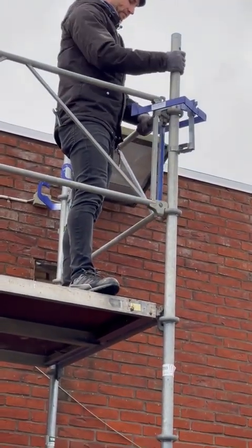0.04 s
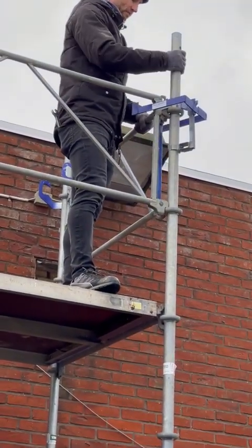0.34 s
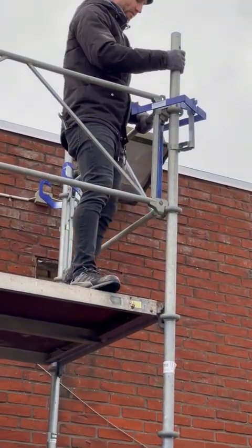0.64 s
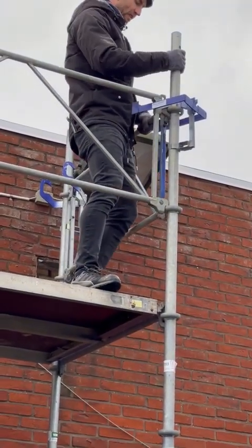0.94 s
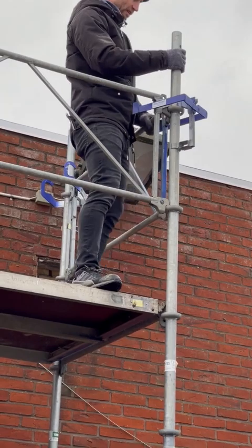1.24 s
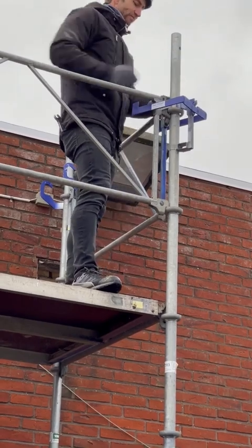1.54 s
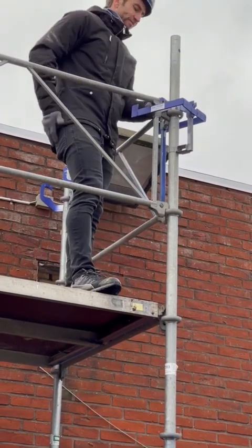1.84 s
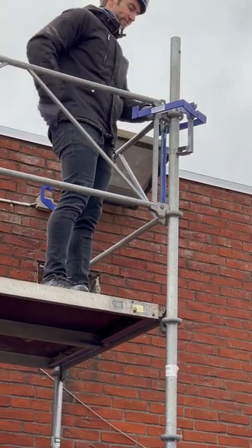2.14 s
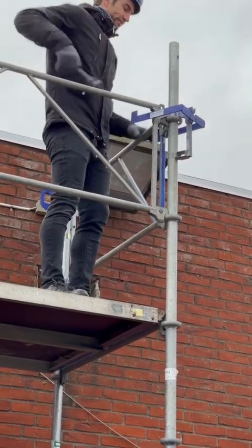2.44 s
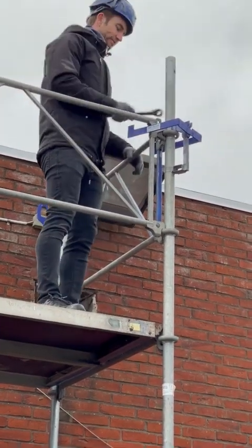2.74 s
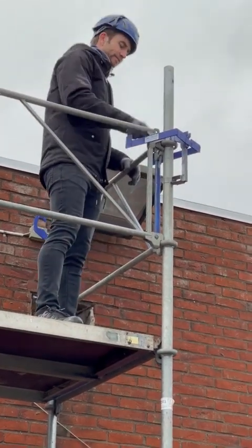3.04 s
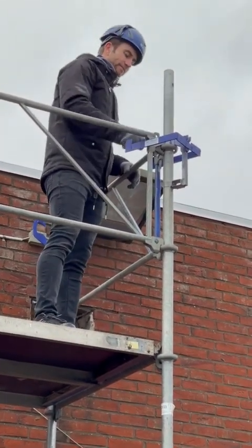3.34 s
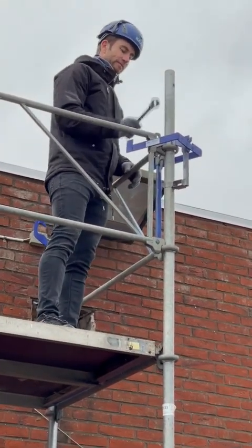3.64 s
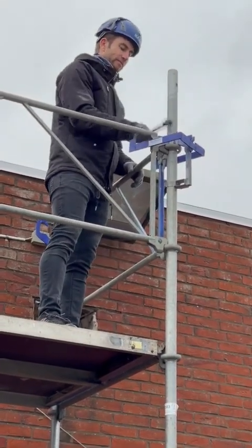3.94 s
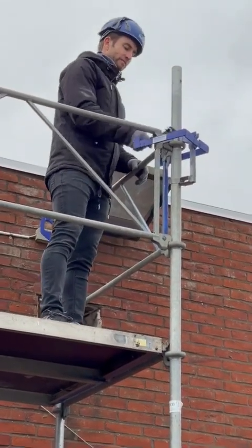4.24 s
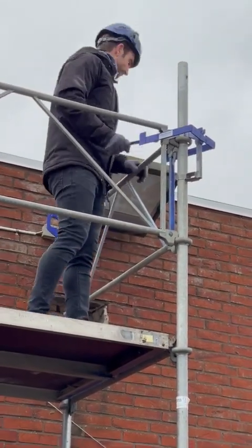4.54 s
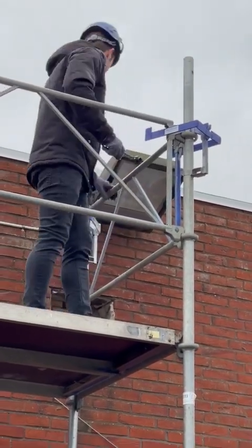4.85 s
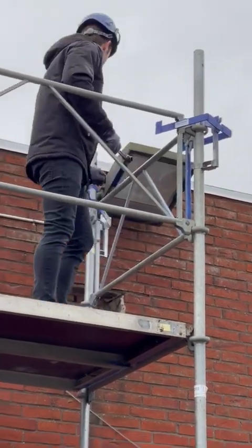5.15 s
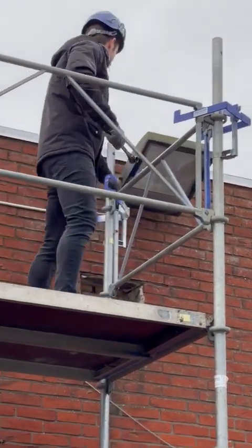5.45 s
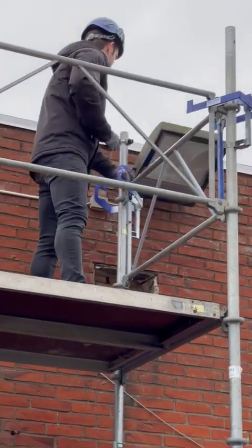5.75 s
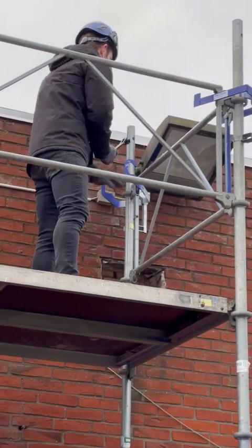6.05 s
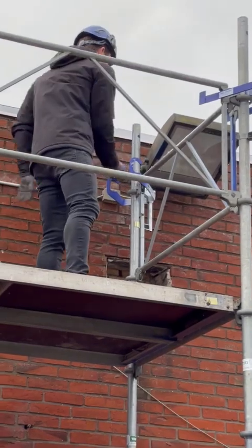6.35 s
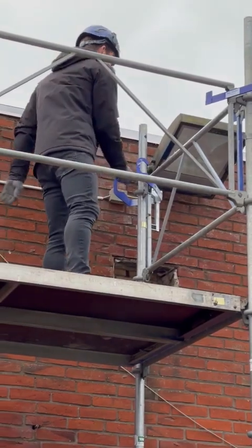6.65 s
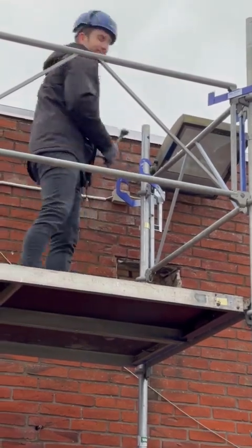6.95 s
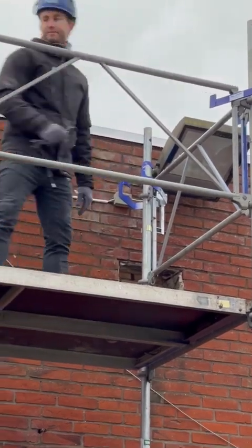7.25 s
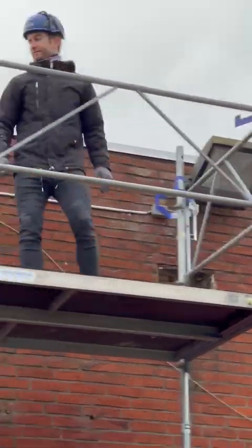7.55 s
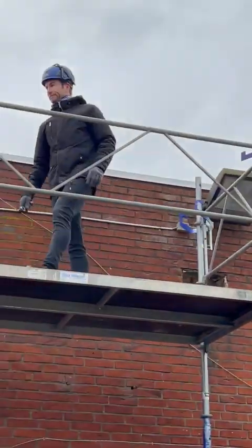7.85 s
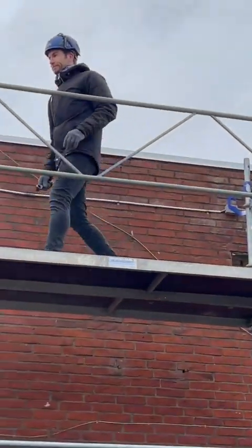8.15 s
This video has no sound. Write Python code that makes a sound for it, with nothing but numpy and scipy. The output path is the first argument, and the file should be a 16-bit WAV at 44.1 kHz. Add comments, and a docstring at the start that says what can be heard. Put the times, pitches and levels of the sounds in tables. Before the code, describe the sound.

Scaffold work is heard close in an outdoor yard, over a low wind rumble and a dull wash of distant traffic. For the first two seconds a guardrail bumps lightly in its seat while loose steel parts clink and tinkle, with a few scuffs of cloth and soles. A boot thuds on the deck at about 2.7 seconds. The loudest sounds are sharp hammer blows on steel clamps: two at 3.0 and 3.3 seconds, and two more at 3.9 and 4.2. Each clangs and leaves the tubes and the yard ringing briefly. After another step, a metal post scrapes down its holder in two pushes between 5.5 and 6 seconds. A last pair of blows lands at 6.3 and 6.6 seconds. From 7 seconds, fittings snap quietly and boots scuff, with soft thuds on the deck around 8 seconds.

```python
"""A scaffold in a yard, in front of a brick wall, heard on a close pair of microphones.
First a worker jiggles a guardrail: it bumps in its seat and loose steel parts clink. A boot thuds on the
deck, then two clamps are hammered home, two blows each. A post scrapes down its holder and a third clamp
takes two blows. Last, fittings snap and boots scuff and thud. The tubes and the yard ring after each
blow; low wind and distant traffic lie under it all."""
import sys
import numpy as np
from scipy import signal
from scipy.fft import rfft, irfft
from scipy.io import wavfile
from scipy.ndimage import uniform_filter1d

SR = 44100
rng = np.random.default_rng(int(sys.argv[2]) if len(sys.argv) > 2 else 0)


def to_wav(s):
    """Save 16-bit WAV."""
    ch = np.atleast_2d(s).T  # columns
    pcm = np.round(np.clip(ch, -1, 1) * 32767)  # PCM
    wavfile.write(sys.argv[1], SR, pcm.astype(np.int16))


N = 366471

# hammer blows: start_s, level_db, bass_db, contact_hz, contact_width_hz, clang_db, ring_db, part
BLOWS = [(3.015, -9.5, -2.5, 1380, 260, -27.5, 3, "coupler"),
         (3.322, -10.5, 0, 1857, 110.4, -26.5, 2.5, "coupler"),
         (3.888, -11, -6, 3250, 597, -26.5, 2, "latch"), (4.218, -13.5, 3.5, 5380, 200, -27, 3.5, "latch"),
         (6.323, -15, -2.5, 2288, 100, -22, -6.5, "post"), (6.634, -14.5, -1, 6800, 252, -26, 2.5, "post")]
# how each part takes a blow: body_db, slope_db_per_octave, chatter_s
PART_RESPONSE = {"coupler": (-2.5, -0.15, 0.0021), "latch": (-4.5, 0.85, 0.0015),
                 "post": (-1.5, 0.86, 0.0077)}
# dense ring of each part: frequency_hz, level_db
PART_COLOUR = {"coupler": [(80, -4), (170, 2), (1000, 3), (3000, -1), (4700, -4.5), (8500, -3.5),
               (10300, 1), (11500, -4.5), (12700, -20)], "latch": [(80, -11), (170, -3), (450, -4),
               (750, 2), (1100, -1.5), (3000, 0.5), (8500, -5), (11200, -2.5), (12700, -22)],
               "post": [(80, 3), (170, 5.5), (700, 9), (1000, 4.5), (3000, 1.5), (6000, -3.5), (8500, -4),
               (11200, -1), (12700, -22)]}
# short clang of each part: pitch_hz, level_db
CLANG_MODES = {"coupler": [(760, -3), (1210, -1), (1365, -3), (1550, -3), (1857, -1), (2130, -1),
               (2439, -1), (3246, -2), (4060, -3), (6960, -2)], "latch": [(770, -5), (1600, -7),
               (2805, -0.5), (3430, -2), (3768, 0), (4055, 1), (5430, -1), (6620, -1)], "post": [(711, -1),
               (1367, 0), (1700, -3), (2288, -2), (2998, 0), (3268, -1), (4075, -1), (6730, 1)]}
# longer ring of each part and its tubes: pitch_hz, level_db, t60_s
PART_MODES = {"coupler": [(528, -37, 0.56), (1087, -40, 0.55), (2480, -41, 0.6), (2918, -42, 0.7),
              (3779, -46, 0.75), (4070, -44, 0.55), (5276, -44, 0.6), (5440, -44, 0.62), (5814, -45, 0.65),
              (7530, -45, 0.65)], "latch": [(2078, -42, 0.6), (2466, -45, 0.55), (2810, -45, 0.55),
              (3020, -46, 0.7), (3779, -43, 0.77), (4565, -47, 0.6), (5030, -39, 0.58), (5179, -40, 0.62),
              (5286, -43, 0.62), (5410, -41, 0.54)], "post": [(740, -39, 0.6), (1367, -45, 0.6),
              (2010, -45, 0.6), (2660, -45, 0.52), (3779, -38.5, 0.82), (4070, -40, 0.55),
              (4130, -42, 0.45), (5405, -43, 0.5), (5560, -42, 0.42), (6720, -44, 0.42)]}
# ring of the struck frame
FRAME_MODES = [(160, -39, 0.45), (214, -44, 1.0), (231, -47, 1.3), (283, -46, 1.5), (340, -47, 0.9),
               (436, -41, 0.9), (482, -43, 1.2), (582, -46, 0.9), (670, -45, 0.9)]  # pitch_hz, level_db, t60_s
FRAME_T60 = [(150, 0.36), (500, 0.28), (1500, 0.26), (4000, 0.27), (7000, 0.22), (12000, 0.22)]  # frequency_hz, t60_s
# each blow's ring is dulled above 12 kHz: frequency_hz, gain_db
BLOW_RING_TOP_CUT = [(12200, 0), (13200, -12)]

# the guardrail bumps in its seat
BUMPS = [(0.144, -37.5, -10.5, 2850), (0.407, -34, -17, 2180), (.889, -39.5, -13, 1700),
         (.909, -36.5, -4.5, 2950), (0.986, -37.5, -60, 2390), (1.309, -38.5, -2.5, 11040),
         (1.35, -35, -22, 2220)]  # start_s, level_db, top_db, contact_hz
BUMP_COLOUR = [(30, -27.5), (70, -4), (200, 9.5), (500, 8.5), (750, 7), (3000, 1.5), (5700, -2.5),
               (11500, 7.5), (13200, -13), (15500, -38)]  # frequency_hz, level_db
RAIL_MODES = [(388, 0, 0.41), (474, -5.5, 0.45), (1055, -3.4, 0.39), (1604, -7, 0.45), (2920, -1, 0.32),
              (6923, -11, 0.4), (7677, -7, 0.44), (11466, -13, 0.45)]  # pitch_hz, level_db, t60_s
# a loose fitting clinks harshly around one pitch
CLINKS = [(1.715, -39, 1.5, 0.33), (2.002, -41, -18.5, 0.12)]  # start_s, level_db, top_db, t60_s
CLINK_COLOUR = [(30, -22), (200, 1.5), (3000, 1), (5700, -5), (11500, -3.5), (13200, -38)]  # frequency_hz, level_db
CLINK_MODES = [(2630, 5, 0.16), (2850, 3.5, 0.06), (2980, 11, 0.22), (3130, 5, 0.05), (3650, 3, 0.25)]  # pitch_hz, level_db, t60_s
# a small pin tinkles
PIN_TINKS = [(.083, -41.5, -4.5), (0.269, -49, 3), (0.478, -55.5, 3.5), (1.663, -47, 4), (4.881, -59.5, 3)]  # start_s, level_db, top_db
PIN_COLOUR = [(100, -21.5), (750, -6.5), (3000, 2), (11500, 5.5), (13200, -22), (15500, -30)]  # frequency_hz, level_db
PIN_MODES = [(7120, -11, 0.16), (10470, 6, 0.063), (11490, 0.5, 0.099), (13200, -14, 0.1),
             (13750, -17, 0.09)]  # pitch_hz, level_db, t60_s
# tight fittings snap with hardly any ring
SNAPS = [(5.609, -41.5, 3.5), (5.752, -49, 2), (5.774, -45.5, 5), (6.312, -50, 10), (6.988, -48, 5),
         (7.093, -37.5, -4.5), (7.377, -52, 7), (7.562, -52, 2), (7.576, -65, 3), (7.726, -45.5, -11),
         (7.747, -44.5, 0), (8.126, -51.5, -3)]  # start_s, level_db, top_db
SNAP_COLOUR = [(30, -20.5), (200, -17.5), (500, -2), (750, 4.5), (3000, 0), (5700, -1), (11500, 5),
               (13200, -27), (15500, -52)]  # frequency_hz, level_db
# one small steel piece chinks again and again, with a bright tick at each touch
CHINKS = [(0.016, -40.5), (0.352, -45), (0.518, -46), (0.603, -44), (0.705, -55), (.802, -42.5),
          (1.003, -45.5), (1.093, -40.5), (1.161, -53), (3.591, -49.5), (5.063, -65.5), (5.1, -68),
          (5.239, -64), (5.282, -65.5), (8.261, -50)]  # start_s, level_db
CHINK_RESONANCES = [(2020, 600, 2), (3100, 420, 4), (5400, 190, 0), (6000, 500, -4), (7340, 1100, -13.5)]  # centre_hz, width_hz, level_db
CHINK_MODES = [(2970, 4, 0.2), (5300, 2, 0.2), (5750, -3, 0.17), (6400, -9, 0.17), (6900, -11, 0.17)]  # pitch_hz, level_db, t60_s
TICK_COLOUR = [(1000, -20.5), (3200, 3.5), (4300, -4), (6200, 0), (10000, -6.5), (13000, -26)]  # frequency_hz, level_db

# the post slides down its holder in two pushes: time_s, level_db
SLIDE_PUSH = [(5.536, -72.5), (5.548, -43), (5.618, -35), (5.64, -44.5), (5.67, -38), (5.722, -53),
              (5.824, -27.5), (5.866, -36.5), (6.1, -65)]
# scuffs of cloth and soles: start_s, length_s, level_db, slope_db_per_octave
SCUFFS = [(1.495, 0.18, -47.5, 0.5), (1.901, 0.055, -39.5, -2), (2.018, 0.085, -45.5, 0),
          (2.205, 0.017, -56.5, 3), (2.286, 0.21, -59.5, 1.5), (6.942, 0.099, -53.5, 6),
          (7.332, 0.15, -43.5, 6), (7.401, 0.08, -45, -1.5), (7.554, 0.037, -45.5, 1),
          (7.981, 0.24, -54.5, 5.5)]
# hiss of sliding contact: frequency_hz, level_db
FRICTION_COLOUR = [(20, -52.5), (150, 2.5), (400, -1), (800, 3), (3000, 2), (5000, -2), (7000, -4),
                   (8500, -4.5), (11300, -2), (12500, -22.5), (15000, -49)]
# heels on the deck: start_s, level_db, pitch_ratio, hardness_db_per_octave, t60_s
STEPS = [(2.667, -38.5, 0.98, -6, 0.28), (5.432, -40, 1.3, -4, 0.13), (8.05, -40.5, 0.95, -5.5, 0.44),
         (8.149, -48, 1.25, -17, 0.22)]
# boom of a deck panel: pitch_hz, level_db
DECK_MODES = [(167, 0), (233, 1.5), (301, -6), (345, -10.5), (410, -11.5), (538, -2.5), (680, -16.5)]

# lingering ring of the yard and the scaffold tubes
YARD_COLOUR = [(100, -2), (250, -6.5), (600, -12.5), (1500, -17), (3000, -19.5), (5300, -15), (7500, -25),
               (12000, -25.5)]  # frequency_hz, level_db
YARD_T60 = [(150, 1.66), (600, 1.12), (2000, 1.64), (5000, 0.82), (11000, 0.97)]  # frequency_hz, t60_s
TUBE_BANDS = [(3630, 18, -3), (5450, 260, -12)]  # centre_hz, width_hz, level_db
# low wind
WIND_LEVEL = [(0.0, -42), (0.9, -49), (0.97, -43.5), (1.83, -48.5), (3.82, -42.5), (4.0, -65.5),
              (4.12, -47), (6.27, -47), (6.32, -45), (8.31, -48.5)]  # time_s, level_db
WIND_COLOUR = [(12, -53), (20, -23.5), (41, -4), (59, 3), (75, 3.5), (118, -14.5), (140, -6.5),
               (180, -33.5), (310, -120)]  # frequency_hz, level_db
# traffic in the distance
TRAFFIC_LEVEL = [(0, -47), (1.5, -49.5), (2.5, -51.5), (4.5, -46.5), (5.2, -56.5), (7, -54.5), (8.3, -53)]  # time_s, level_db
TRAFFIC_COLOUR = [(20, -34), (60, -26), (110, -3.5), (200, 3.5), (400, -5), (700, -2), (1100, -7.5),
                  (2000, -15), (3200, -24.5), (5000, -32.5), (11000, -28), (14000, -60.5)]  # frequency_hz, level_db
# the microphone pair: left against right, and the sound they do not share
MIC_PHASE = [(0, 0), (1460, .1), (4130, .9), (4740, 1.9), (5200, 4.9), (5600, 6.1), (6290, 6.5),
             (8350, 8.9), (9560, 9.7), (12000, 12.3), (16000, 13)]  # frequency_hz, left_lead_rad
MIC_BALANCE = [(130, 0.0), (640, 2.0), (1410, 0.5), (3100, 0.0)]  # frequency_hz, left_minus_right_db
MIC_SPREAD = [(50, -46), (140, -43.5), (300, -22.5), (600, -8), (2000, -16), (12000, -38)]  # frequency_hz, side_db


def hammer_blows(size=32768):
    """Steel chatters on steel for some milliseconds; the clamp rings and the frame takes up the bass."""
    out, t = np.zeros(N), np.arange(size) / SR
    hz, combs = bins(t), {part: ripple(size) for part in PART_COLOUR}
    clang_t60_s, contact_boost_db = 0.135, 6
    band_edges_db = read([(25, -31), (80, 0), (12700, 2), (14000, -23), (15500, -33)], hz)
    bass_share = read([(400, 1), (1000, 0.49)], hz)
    for start_s, db, bass_db, contact_hz, width_hz, clang_db, ring_db, part in BLOWS:
        body_db, slope_db, chatter_s = PART_RESPONSE[part]
        tilt_db = slope_db * np.log2((hz + 100) / 3000)
        colour = amp(read(PART_COLOUR[part], hz) + band_edges_db + tilt_db + bass_db * bass_share)
        contact_band = 1 + amp(-2.5) * peak(hz, contact_hz, width_hz)
        crack = filtered(noise(size), colour * contact_band)
        crack = coloured(crack, [(200, -8), (700, -14.5), (1500, -6.5), (12000, 1.5)])
        crack *= np.exp(-np.maximum(t - chatter_s, 0) / 0.015)
        snap = coloured(noise(size), [(1000, -14), (6000, 3), (13000, 0.5), (15500, -4.5)])
        snap *= np.exp(-t / 0.005)
        body = filtered(noise(size), colour * amp(4.5 * combs[part] - 2.2))
        body = dying(coloured(body, BLOW_RING_TOP_CUT), FRAME_T60) * (1 - np.exp(-t / 0.022))
        clang_modes = [(pitch, level + contact_boost_db * peak(pitch, contact_hz, width_hz), clang_t60_s)
                       for pitch, level in CLANG_MODES[part]]
        sound = amp(db + 7) * (crack + amp(body_db) * body + amp(-20.5) * snap)
        sound += amp(clang_db) * ring(clang_modes, t)
        sound += amp(ring_db) * ring(PART_MODES[part], t)
        sound += amp(bass_db) * ring(FRAME_MODES, t) * (1 - np.exp(-t / 0.028))
        add(out, start_s - 0.002, sound * np.minimum(t / 0.0032, 1) ** 1.9)
    return out


def rail_and_fittings(size=20000):
    """Rail, fittings and pin knock as they are handled; each heel shakes the rail too."""
    out = np.zeros(N)
    rail, fitting, pin = (amp(4.5 * ripple(size) - 2) for _ in range(3))
    for start_s, db, top_db, contact_hz in BUMPS:
        add(out, start_s, amp(db) * knock(BUMP_COLOUR, rail, RAIL_MODES, top_db, t60_s=0.32,
                                          contact_hz=contact_hz, tone_db=-3.5, click_db=-6.5))
    for start_s, db, top_db, t60_s in CLINKS:
        add(out, start_s, amp(db) * knock(CLINK_COLOUR, fitting, CLINK_MODES, top_db, t60_s,
                                          contact_hz=2935, tone_db=-9.5, click_db=-4))
    for start_s, db, top_db in PIN_TINKS:
        add(out, start_s, amp(db) * knock(PIN_COLOUR, pin, PIN_MODES, top_db, t60_s=0.26,
                                          contact_hz=10950, tone_db=6.5, click_db=-4))
    for start_s, db, top_db in SNAPS:
        add(out, start_s, amp(db) * knock(SNAP_COLOUR, fitting, RAIL_MODES, top_db, t60_s=0.17,
                                          contact_hz=2415, tone_db=-17, click_db=5.5))
    for start_s, db, _, _, t60_s in STEPS:
        shake = knock(BUMP_COLOUR, rail, RAIL_MODES, top_db=-28, t60_s=0.89 * t60_s,
                      contact_hz=813, tone_db=-3.5, click_db=-6.5)
        add(out, start_s, amp(db - 11) * shake)
    return out


def knock(shape, comb, modes, top_db, t60_s, contact_hz, tone_db, click_db):
    """A steel piece clicks, then rings densely, longest in the bass, under a few clear modes."""
    size = 2 * (len(comb) - 1)
    t = np.arange(size) / SR
    hz = bins(t)
    # a softer contact loses treble with the square of frequency, reaching top_db at 11.5 kHz
    hardness = amp(top_db * np.minimum(hz / 11500, 1) ** 2)
    colour = amp(read(shape, hz)) * comb * (1 + 0.9 * peak(hz, contact_hz, 140))
    dense = amp(8) * filtered(noise(size), colour * hardness)
    body = dying(dense, [(400, 1.3 * t60_s), (2000, t60_s)], bands=4)
    tone = filtered(ring(modes, t), hardness)
    attack = np.minimum(t / (0.0095 * t60_s), 1)
    release = np.minimum((t[-1] - t) / t60_s, 1)
    click = amp(click_db) * fade(t, 0.006) * dense
    return (body + amp(tone_db) * tone) * attack * release + click


def chinks(size=20000):
    """Each light touch on a small steel piece ticks and wakes the same resonances and clear modes."""
    out, t = np.zeros(N), np.arange(size) / SR
    hz, comb = bins(t), amp(5 * ripple(size))
    colour = comb * sum(amp(db) * peak(hz, centre, width) for centre, width, db in CHINK_RESONANCES)
    sharp_share, settle_s = 0.05, 0.009  # the note starts sharp, then settles
    bent_time = t + sharp_share * settle_s * (1 - np.exp(-t / settle_s))
    for start_s, db in CHINKS:
        body = amp(-1) * unit_rms(filtered(noise(size), colour)) * fade(t, t60_s=0.45)
        tone = amp(-8.5) * ring(CHINK_MODES, bent_time)
        tick = amp(-3) * unit_rms(coloured(noise(size), TICK_COLOUR)) * fade(t, t60_s=0.02)
        add(out, start_s, amp(db) * (body + tone + tick) * np.minimum(t / 0.00093, 1))
    return out


def post_slide(size=32768):
    """The post scrapes along its holder and rings as hard as it is pushed."""
    out, t = np.zeros(N), np.arange(size) / SR
    start_s = SLIDE_PUSH[0][0]
    push = amp(np.interp(start_s + t, *np.transpose(SLIDE_PUSH), right=-np.inf))
    resonance = 1 + sum(amp(db - 14) * peak(bins(t), hz, 60) for hz, db in CLANG_MODES["post"])
    scrape = filtered(friction(size, slope_db=0.8), resonance * amp(2.5 * ripple(size)))
    add(out, start_s, amp(0.5) * push * unit_rms(scrape))
    return out


def scuffs(size=32768):
    """Cloth and soles rub: each stroke swells, sags while it lasts and dies away."""
    out, t = np.zeros(N), np.arange(size) / SR
    swell_share, sag_db_per_s = 0.31, 16
    for start_s, length_s, db, slope_db in SCUFFS:
        swell = np.sin(np.pi / 2 * np.minimum(t / (swell_share * length_s), 1)) ** 2
        release = fade(np.maximum(t - length_s, 0), t60_s=0.44)
        pressure = swell * amp(-sag_db_per_s * t) * release
        add(out, start_s, amp(db) * pressure * friction(size, slope_db))
    return out


def friction(size, slope_db):
    """Sliding contact: a hiss of tiny slips with a few larger catches, sticking and letting go unevenly."""
    slips_per_s, stick_db = 1500, 2.2
    slips = (rng.random(size) < slips_per_s / SR) * noise(size)
    slips *= amp(2.3 * np.minimum(rng.exponential(1, size), 4))
    sticking = amp(stick_db * unit_rms(uniform_filter1d(noise(size), size=250)))
    grain = (unit_rms(slips) + 2.7 * noise(size)) * sticking
    colour = [(hz, db + slope_db * np.log2(hz / 3000)) for hz, db in FRICTION_COLOUR]
    return unit_rms(coloured(grain, colour))


def boot_steps(size=20000):
    """A heel pushes the deck panel, which booms in a few low modes."""
    out, t = np.zeros(N), np.arange(size) / SR
    for start_s, db, pitch_ratio, hardness_db, t60_s in STEPS:
        modes = [(hz * pitch_ratio, level + hardness_db * np.log2(hz / 230), t60_s)
                 for hz, level in DECK_MODES]
        add(out, start_s, amp(db) * ring(modes, t) * np.minimum(t / 0.0016, 1))
    return out


def yard_echo(x, size=65536):
    """A diffuse tail swells as echoes come back from the walls; the tubes sing on in narrow bands."""
    t = np.arange(size) / SR
    tail = dying(noise(size), YARD_T60) * (1 - np.exp(-(t / 0.027) ** 2))
    tail = coloured(tail, YARD_COLOUR) * amp(-33.5)
    singing = 1 + sum(amp(db) * peak(bins(t), hz, width) for hz, width, db in TUBE_BANDS)
    return signal.fftconvolve(x, filtered(tail, singing))[:N]


def wind():
    """Wind rumbles unevenly in the low bass."""
    return amp(-1) * follow(WIND_LEVEL) * unit_rms(coloured(noise(N), WIND_COLOUR))


def distant_traffic():
    """Far traffic arrives as a dull wash that slowly swells and sinks."""
    return follow(TRAFFIC_LEVEL) * unit_rms(coloured(noise(N), TRAFFIC_COLOUR))


def microphone_pair(mono):
    """Two close microphones part in phase in the treble; nearby surfaces reflect differently to each."""
    hz, mid = bins(mono), rfft(mono)
    t = np.arange(SR // 10) / SR
    scatter = noise(len(t)) * fade(t, t60_s=0.17)
    side = mid * rfft(scatter / np.linalg.norm(scatter), N) * amp(read(MIC_SPREAD, hz))
    leftward = amp(read(MIC_BALANCE, hz) / 2) * np.exp(0.5j * read(MIC_PHASE, hz))
    return np.array([irfft((mid + side) * leftward, N), irfft((mid - side) / leftward, N)])


def ring(modes, t, waver_s=0.014):
    """Decaying modes; loose joints make each one waver in strength and phase."""
    hz, db, t60_s = np.transpose(modes)[:, :, None]
    strength = amp(db + noise(hz.shape))
    knots = np.arange(0, t[-1] + waver_s, waver_s)
    waver = np.array([np.interp(t, knots, 1 + 0.45 * (real + 1j * imag))
                      for real, imag in noise((len(hz), 2, len(knots)))])
    tones = np.exp(2j * np.pi * (hz * t + rng.random(hz.shape)))
    return (strength * fade(t, t60_s) * waver * tones).real.sum(0)


def ripple(size):
    """Countless close modes make an uneven comb over the spectrum of a part, deepest in the treble."""
    depth = read([(400, 0.25), (2000, 0.75), (5000, 0.85)], np.fft.rfftfreq(size, 1 / SR))
    comb = unit_rms(uniform_filter1d(noise(size // 2 + 1), size=26))
    return depth * np.clip(comb, -2, 2)


def dying(x, t60_points, bands=8):
    """Splits x into overlapping bands and lets each die at its own speed."""
    t, centres = np.arange(len(x)) / SR, np.geomspace(150, 12000, bands)
    return sum(filtered(x, read(np.c_[centres, band], bins(x))) * fade(t, read(t60_points, hz))
               for hz, band in zip(centres, np.eye(bands)))


def read(points, hz):
    """Joins (frequency_hz, value) points by straight lines on a log-frequency axis."""
    point_hz, value = np.transpose(points)
    return np.interp(np.log(hz + 1), np.log(np.abs(point_hz) + 1), value)


def follow(rows):
    """Gain over the whole scene from (time_s, level_db) rows."""
    return amp(np.interp(np.arange(N) / SR, *np.transpose(rows)))


def coloured(x, points):
    """Shapes x by (frequency_hz, level_db) points."""
    return filtered(x, amp(read(points, bins(x))))


def filtered(x, gain):
    return irfft(rfft(x) * gain, len(x))


def peak(hz, centre_hz, width_hz):
    return 1 / (1 + ((hz - centre_hz) / width_hz) ** 2)


def fade(t, t60_s):
    return amp(-60 * t / t60_s)


def bins(x):
    return np.fft.rfftfreq(len(x), 1 / SR)


def noise(shape):
    return rng.standard_normal(shape)


def amp(db):
    return 10 ** (np.asarray(db) / 20)


def unit_rms(x):
    return x / np.sqrt(np.mean(x ** 2) + 1e-20)


def add(mix, start_s, sound):
    part = mix[max(0, round(start_s * SR)):][:len(sound)]
    part += sound[:len(part)]


def scene():
    """The scaffold work up close, the yard around it, wind and traffic behind."""
    near = hammer_blows() + rail_and_fittings() + chinks() + scuffs() + post_slide()
    boots = boot_steps()
    echo = yard_echo(near + amp(-24) * boots)
    return microphone_pair(near + boots + echo + wind() + distant_traffic())


def record(dry):
    """The loudest peaks are rounded off and the treble is cut above 16 kHz."""
    rounded = dry / (1 + dry ** 6) ** (1 / 6)
    lowpass = signal.firwin(511, 16000, window=("kaiser", 9), fs=SR)
    return signal.oaconvolve(rounded, lowpass[None], "same")


dry = scene()
out = record(dry)
to_wav(out)
```